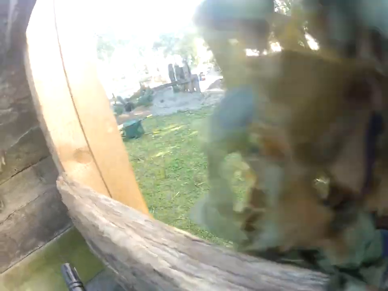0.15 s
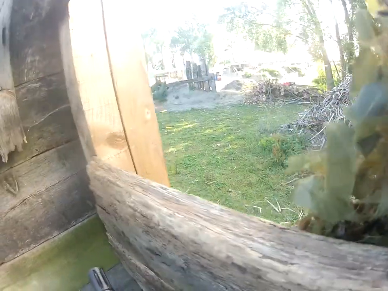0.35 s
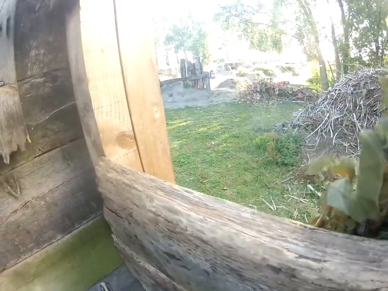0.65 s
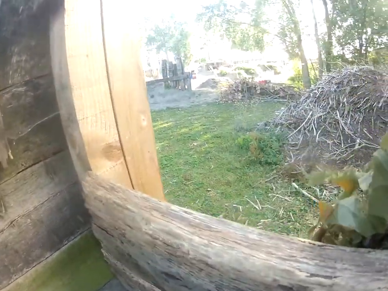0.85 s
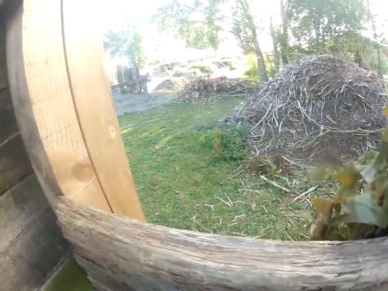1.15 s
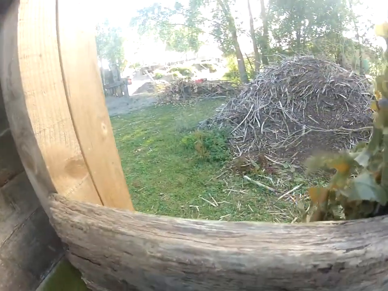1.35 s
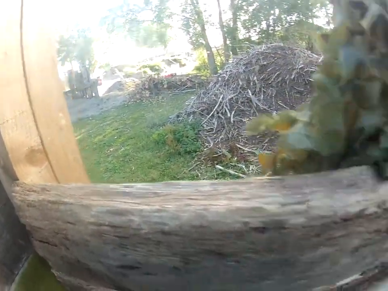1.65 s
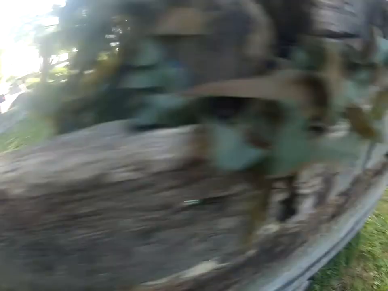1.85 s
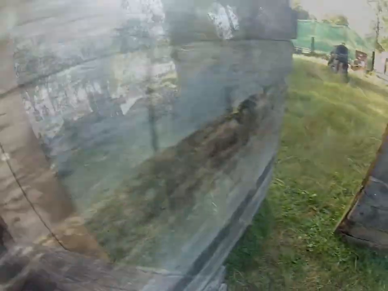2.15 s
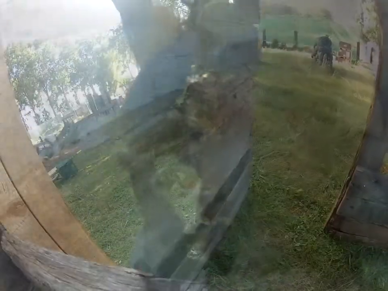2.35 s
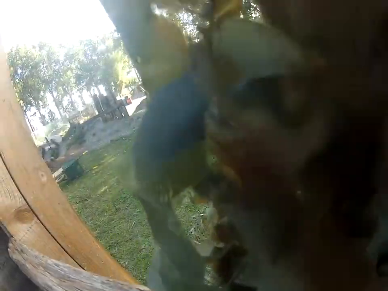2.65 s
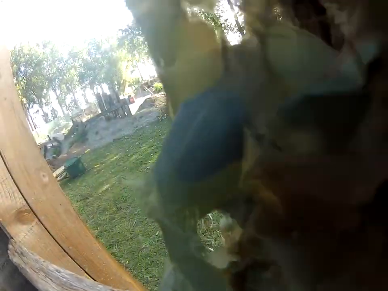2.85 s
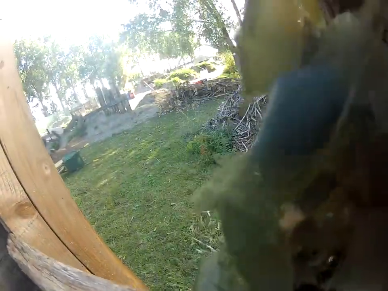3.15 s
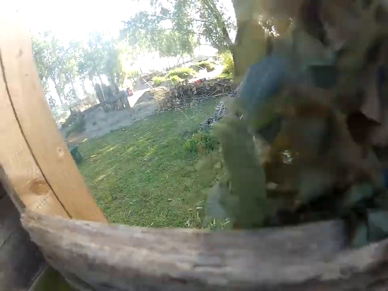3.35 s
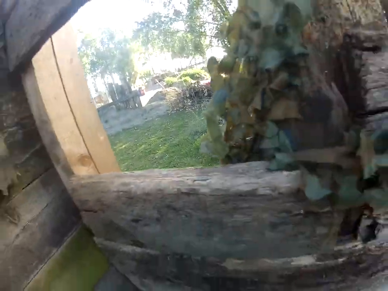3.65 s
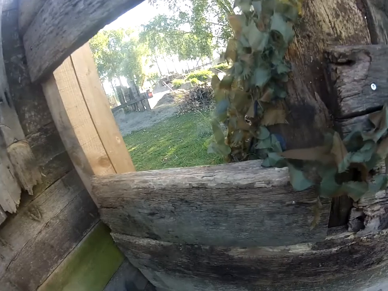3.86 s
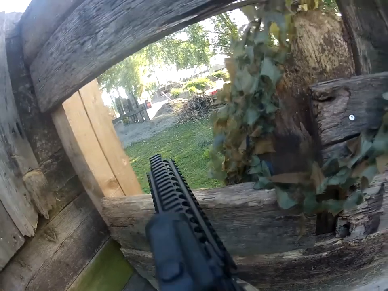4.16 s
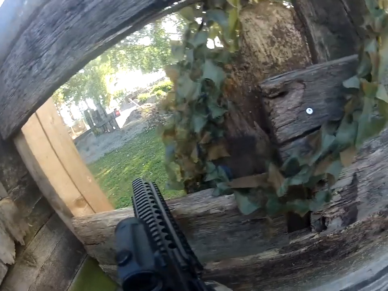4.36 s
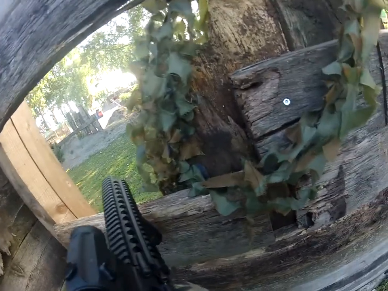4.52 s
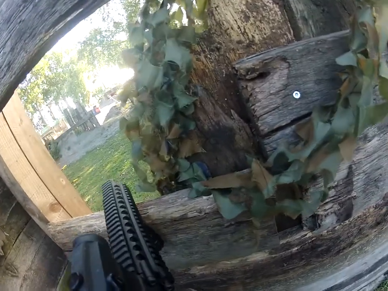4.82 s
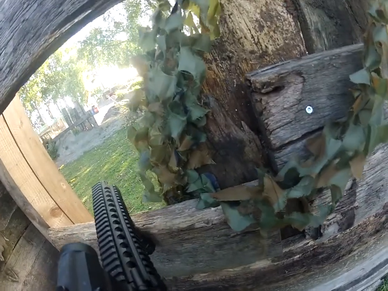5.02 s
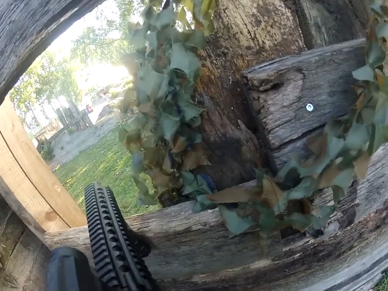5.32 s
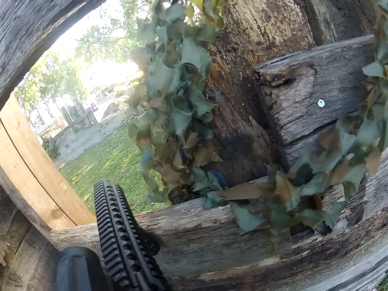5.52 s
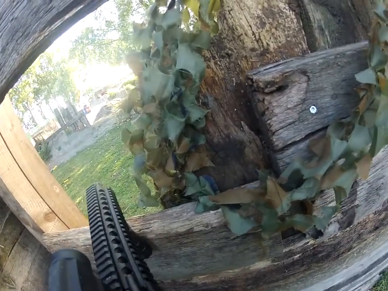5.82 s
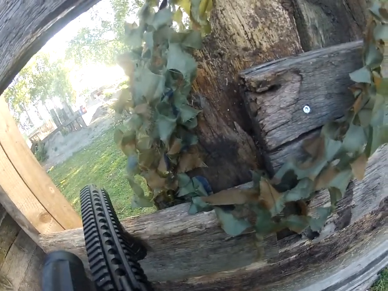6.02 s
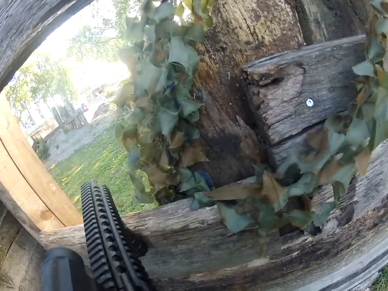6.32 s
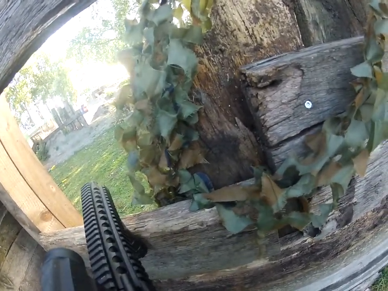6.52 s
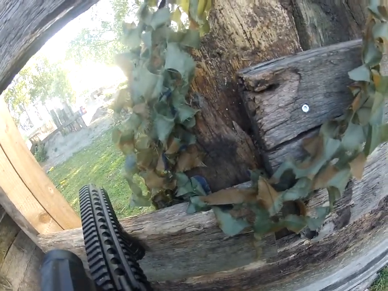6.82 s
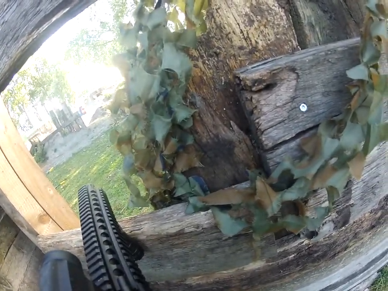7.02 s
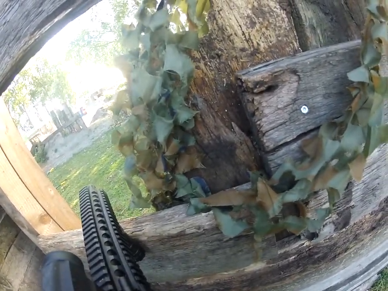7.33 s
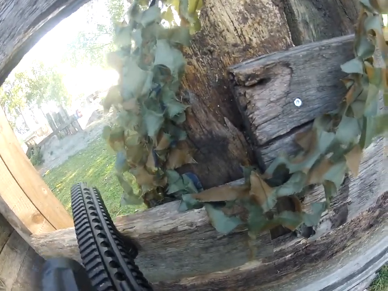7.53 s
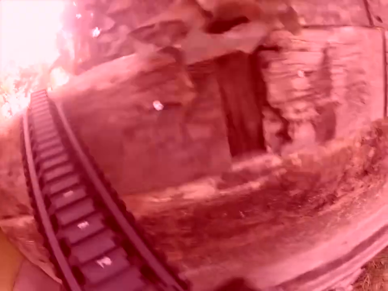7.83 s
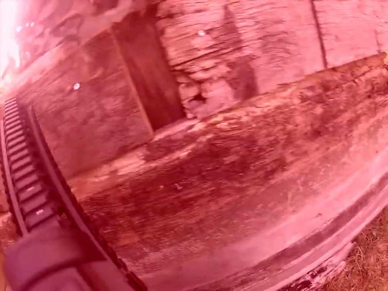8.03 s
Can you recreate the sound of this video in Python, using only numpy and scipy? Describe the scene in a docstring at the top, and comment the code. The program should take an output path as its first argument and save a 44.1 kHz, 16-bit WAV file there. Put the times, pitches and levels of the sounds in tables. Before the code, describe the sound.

Faint outdoor hush and gear clicks, then seven quick whirring airsoft rifle snaps, ending in loud, close pellet hits.

```python
"""A dull open-field hush with sparse gear clicks, bumps and rustles, heard by a body camera in a case.
From 5.7 s an electric airsoft rifle fires seven single cycles from behind a wooden barricade:
the motor spins up, gears draw the spring, the piston slams and the camera mount shakes.
At the end pellets strike right by the microphone and overload it."""
import sys
import numpy as np
from scipy import signal
from scipy.fft import rfft, irfft, next_fast_len
from scipy.io import wavfile
from scipy.ndimage import minimum_filter1d

SR = 44100
rng = np.random.default_rng(int(sys.argv[2]) if len(sys.argv) > 2 else 0)


def unload_wav(signal):
    """Save mono or channel-first audio to the path in sys.argv[1] as 16-bit WAV at rate SR, clipped to [-1, 1]."""
    wavfile.write(
        sys.argv[1],
        SR,
        np.round(np.clip(np.atleast_2d(signal).T, -1, 1) * 32767).astype(np.int16),
    )


N = 360738


def amp(db):
    return 10 ** (np.asarray(db) / 20)


def unit(x):
    return x / np.sqrt(np.mean(x ** 2) + 1e-20)


def add(track, s, sound):
    """Mix a sound into the track at s seconds."""
    part = track[round(s * SR):][:len(sound)]
    part += sound[:len(part)]


def body(x, spectrum, modes=(), size=8192):
    """x through a causal body of unit energy: a broad colour with resonances on top."""
    f = np.fft.rfftfreq(size, 1 / SR)
    hz, db = np.transpose(spectrum)
    cepstrum = irfft(np.log(amp(np.interp(np.log(f + 1), np.log(hz), db))))
    cepstrum[1:size // 2] *= 2
    cepstrum[size // 2 + 1:] = 0
    peaks = 1 + sum(amp(lift) * 1j * f * w / (c * c - f * f + 1j * f * w) for c, w, lift in modes)
    answer = irfft(np.exp(rfft(cepstrum)) * peaks)
    return signal.fftconvolve(x, answer / np.linalg.norm(answer))[:len(x)]


def fade(t, t60):
    """Falls 60 dB in t60 seconds."""
    return np.exp(-np.log(1000) * t / t60)


def ring(modes, attack):
    """One second of damped modes."""
    t = np.arange(SR) / SR
    partials = sum(amp(db) * np.sin(2 * np.pi * hz * t) * fade(t, t60) for hz, db, t60 in modes)
    return partials * (1 - np.exp(-t / attack))


def burst(t60):
    """The dense chatter of a hard contact, dying away."""
    t = np.arange(SR // 4) / SR
    return rng.standard_normal(len(t)) * fade(t, t60)


def grains(count, rate, spread_db):
    """Noise of rms 1 whose strength jumps rate times a second."""
    knots = rng.standard_normal(count)
    level_db = spread_db * np.interp(np.arange(count) * rate / SR, np.arange(count), knots)
    return unit(rng.standard_normal(count) * amp(level_db))


def swell(t, length, attack, release):
    """Rises from t = 0, holds until length, then dies with a t60 of release."""
    return np.clip(t / attack, 0, 1) * fade(np.maximum(t - length, 0), release)


def strokes(rows, attack_s, sag_db_per_s, t60_s, rest_db):
    """Gain of a series of sagging movements over a resting level."""
    t = np.arange(2 * SR) / SR
    power = np.full(N, amp(rest_db) ** 2)
    for start_s, length_s, db in rows:
        gain = amp(db - sag_db_per_s * t) * swell(t, length_s, attack_s, t60_s)
        add(power, start_s, gain ** 2)
    return np.sqrt(power)


def brighter(spectrum, treble_db):
    """A harder contact lifts the treble of a spectrum."""
    return [(hz, db + treble_db * hz ** 2 / (hz ** 2 + 3500 ** 2)) for hz, db in spectrum]


# field air: (frequency [Hz], density [dB])
AIR_SPECTRUM = [(12, -34.5), (20, -4), (60, -6.5), (182, -17), (210, -12), (485, -20.5), (607, -25),
                (1530, -35), (1910, -34.5), (3340, -33), (6010, -44), (8650, -42), (12400, -46.5),
                (14700, -53.5), (16000, -54.5)]

def field_hush():
    """The steady, dull hush of the open field."""
    return amp(-62) * unit(body(rng.standard_normal(N + SR), AIR_SPECTRUM)[SR:])


# mount rumble: (frequency [Hz], density [dB])
RUMBLE_SPECTRUM = [(20, -23), (55, 3), (100, -5.5), (160, -6), (215, -17.5), (300, -31.5), (500, -37),
                   (1000, -53), (2000, -110)]
# body movements: (start [s], length [s], level [dB])
WEIGHT_SHIFTS = [(.13, 0.05, -57.5), (1.78, .22, -52), (3.42, 0.032, -54.5), (4.27, 0.073, -31.5),
                 (4.43, 0.31, -42.5), (4.89, 0.26, -49), (5.05, .2, -44.5), (5.41, .15, -51),
                 (5.79, 1.2, -49.5), (7.5, 0.28, -45), (7.815, 0.099, -18), (7.94, 0.073, -46.5)]

def weight_shifts():
    """The shooter shifts his weight and the camera mount rumbles."""
    gain = strokes(WEIGHT_SHIFTS, attack_s=.021, sag_db_per_s=11, t60_s=.15, rest_db=-67.5)
    return gain * unit(body(rng.standard_normal(N), RUMBLE_SPECTRUM))


def mount_buzz(shake):
    """A thin buzz near 12 kHz follows the shaking."""
    spectrum = [(10000, -74), (11600, -17), (11900, 4.5), (12200, 5.5), (12500, -29.5), (14000, -63)]
    return amp(-27) * np.abs(shake) * unit(body(rng.standard_normal(N), spectrum))


# light contacts: (time [s], level [dB], centre [Hz], t60 [s], treble [dB])
GEAR_CLICKS = [(.197, -42.5, 2050, .045, 10), (1.959, -56.5, 4800, .05, 13), (2.896, -56, 2200, 0.033, 4),
               (4.269, -35.5, 1830, 0.019, 0), (4.284, -45, 1290, 0.036, -20),
               (4.313, -49, 1220, 0.027, -32), (4.459, -45.5, 1110, 0.038, -48),
               (4.554, -56, 2000, 0.038, 9), (5.261, -47, 1030, 0.027, -30),
               (5.289, -43.5, 1790, 0.053, 3.5), (5.608, -42, 2080, 0.052, 7), (7.063, -36, 2020, 0.053, 7),
               (7.238, -33.5, 2170, 0.049, 9), (7.623, -31, 5400, 0.043, 8), (7.744, -39.5, 2360, 0.12, 0),
               (8.036, -54.5, 1500, 0.056, -6.5)]
# click colour: (frequency [Hz], density [dB])
CLICK_SPECTRUM = [(200, -21), (550, -4.5), (1200, 4.5), (2400, -1.5), (3800, -2.5), (5000, -4),
                  (9000, -9.5), (12000, -8), (15000, -11), (16000, -38.5)]
# gearbox and receiver: (centre [Hz], width [Hz], lift [dB])
RIFLE_RESONANCES = [(1100, 69, -4.5), (1905, 140, 16.5), (2350, 150, 9), (2794, 80, 7.5), (3170, 230, 3.5),
                    (3700, 170, 5), (4900, 110, -8.5), (7000, 93, -7), (8260, 240, 6.5), (9100, 43, 9.5),
                    (9870, 68, 6.5), (14050, 76, 10.5)]

def gear_clicks():
    """Small pitched contacts: bright on the rifle's parts, dull on wood."""
    out = np.zeros(N)
    for s, db, hz, t60, treble_db in GEAR_CLICKS:
        wake_db = min(treble_db, 0) - 2  # dull contacts hardly wake the rifle
        modes = [(f, width, lift + wake_db) for f, width, lift in RIFLE_RESONANCES]
        click = body(burst(t60), brighter(CLICK_SPECTRUM, treble_db), [(hz, .2 * hz, 6)] + modes)
        add(out, s, amp(db) * click)
    return out


# mount bumps: (time [s], level [dB], pitch [Hz], t60 [s])
MOUNT_BUMPS = [(0.401, -40.5, 43.5, 0.15), (2.60, -28.5, 66, 0.13), (4.261, -11, 73, 0.04),
               (4.31, -25.5, 62.3, 0.25), (4.42, -15, 54.4, 0.1), (4.496, -24, 88.5, 0.075),
               (4.55, -26, 120, 0.078), (5.072, -28.5, 135, 0.055), (7.4452, 7, 320, .026),
               (7.835, -20, 75, 0.19), (7.863, -13, 46.8, 0.31)]

def mount_bumps():
    """Each bump rings two low modes of the camera mount."""
    out = np.zeros(N)
    for s, db, hz, t60 in MOUNT_BUMPS:
        add(out, s, amp(db) * ring([(hz, 0, t60), (1.97 * hz, -6, t60 / 2)], attack=.007))
    return out


# knocks and pellets: (time [s], crack [dB], centre [Hz], t60 [s], treble [dB], thud [dB])
CASE_STRIKES = [(1.004, -39, 3500, 0.042, 9, -65), (1.7602, -32, 1250, 0.023, -2.5, -55),
                (7.4451, 10.5, 3690, 0.018, 4.5, -1.5), (7.6602, 3.5, 1780, 0.02, 3, -4),
                (7.809, 8.5, 2224, 0.021, 3, 12.5), (7.829, -12, 2430, 0.026, -0.5, -27),
                (7.8566, -5, 1487, 0.021, -9, -8), (7.884, -15, 1930, 0.016, -7, -16.5),
                (7.9356, 1.5, 1136, 0.015, 0.5, -10)]
# case colour: (frequency [Hz], density [dB])
CASE_SPECTRUM = [(150, -4.5), (400, -4.5), (800, -3), (1200, 0), (2700, -0.5), (3900, -7.5), (4600, -17),
                 (7000, -18.5), (9500, -12), (12000, -9.5), (14800, -12), (16000, -55)]
# case modes: (centre [Hz], width [Hz], lift [dB])
CASE_RESONANCES = [(1220, 120, -3.5), (1755, 110, 5.5), (2750, 110, -7.5), (3700, 280, -1), (8420, 200, 4)]
# metal fittings: (time [s], level [dB], pitch [Hz], t60 [s])
FITTING_PINGS = [(7.4452, -50.5, 706, 1), (7.6601, -34, 830, 0.14), (7.9355, -44, 840, 0.132)]

def strikes():
    """Close blows crack in the case, which flexes with a thud; some pellets ring a metal fitting."""
    out = np.zeros(N)
    thud = ring([(215, 0, .025)], attack=.00073)
    for s, crack_db, hz, t60, treble_db, thud_db in CASE_STRIKES:
        modes = [(hz, .13 * hz, 4)] + CASE_RESONANCES
        add(out, s, amp(crack_db) * body(burst(t60), brighter(CASE_SPECTRUM, treble_db), modes))
        add(out, s, amp(thud_db) * thud)
    for s, db, hz, t60 in FITTING_PINGS:
        add(out, s, amp(db) * ring([(hz, 0, t60), (2.4 * hz, -12, .2)], attack=.001))
    return out


# brushes on the net: (start [s], length [s], level [dB])
NET_BRUSHES = [(1.33, 0.044, -67), (1.73, .03, -66), (1.94, 0.095, -71.5), (2.88, 0.23, -72),
               (3.06, .04, -64), (3.14, 0.073, -66.5)]

def net_crackle():
    """The camouflage net's leaves crackle when brushed."""
    spectrum = [(500, -20.5), (1400, 0), (2200, 6.5), (4000, -1), (6000, -8.5), (9000, -6), (15000, -6)]
    leaves = unit(body(grains(N, rate=330, spread_db=5.5), spectrum))
    return leaves * strokes(NET_BRUSHES, attack_s=.02, sag_db_per_s=10, t60_s=.17, rest_db=-78)


# cloth on wood: (start [s], length [s], level [dB])
CLOTH_RUBS = [(1.72, 0.25, -63.5), (2.08, .1, -65), (2.26, 0.036, -67.5), (4.27, 0.054, -65.5),
              (4.53, .1, -72), (7.55, 0.057, -61.5), (7.82, 0.052, -28), (7.885, 0.052, -28)]
# friction colour: (frequency [Hz], density [dB])
RUB_SPECTRUM = [(200, -14), (700, -2), (1200, 1), (2400, -4.5), (3800, -10), (5500, -20), (10000, -11),
                (14500, -20.5), (16000, -39)]
# rubbed wood: (centre [Hz], width [Hz], lift [dB])
PLANK_RESONANCES = [(1196, 190, 3.5), (1865, 200, 9)]

def cloth_rubs():
    """Sleeves and netting catch and slip over the wood."""
    friction = unit(body(grains(N, rate=440, spread_db=2.5), RUB_SPECTRUM, PLANK_RESONANCES))
    return friction * strokes(CLOTH_RUBS, attack_s=.013, sag_db_per_s=8.5, t60_s=.072, rest_db=-75.5)


LEAD_S, CATCH_S, DROP_S = .13, .057, .012  # before the slam: motor start, piston caught, let go

def motor_cycle():
    """Time from the slam, tooth rate and gear level: the spring's load slows and loudens the gears."""
    full_speed_hz, load_sag = 1446, .33
    spin_up_s, coast_s, quieten_s = .075, .09, .056
    t = np.arange(round(2 * LEAD_S * SR)) / SR - LEAD_S
    after_s = np.maximum(t, 0)
    spin = np.sin(np.pi / 2 * np.clip((t + LEAD_S) / spin_up_s, 0, 1))
    draw = np.clip((t + CATCH_S) / (CATCH_S - DROP_S), 0, 1)
    rundown = 1 - np.exp(-after_s / quieten_s)
    tooth_hz = full_speed_hz * spin * (1 - load_sag * draw * (t < 0)) * np.exp(-after_s / coast_s)
    load_db = -10.5 - 31 * (1 - spin) + 11.5 * draw - 46.5 * rundown
    return t, tooth_hz, load_db


# firing cycles: (slam time [s], slam [dB], gears [dB], mount kick [dB], run-down offset [dB])
FIRING_CYCLES = [(5.8652, -18, -31, -24.5, 3), (6.0669, -18, -30.5, -20.5, 2), (6.2535, -18, -31, -23, 2),
                 (6.4533, -17, -31, -20.5, 1.5), (6.684, -18, -31.5, -22, 3.5),
                 (6.9153, -18, -31, -24, 3.5), (7.4500, -25, -31.5, -25, -16.5)]
# sector gear catches, drags, drops the piston: (time from slam [s], level re gears [dB], t60 [s])
SECTOR_TICKS = [(-.057, 2, .035), (-.034, -1, 0.018), (-.012, 8, .02)]
# released spring: (frequency [Hz], level [dB], t60 [s])
SPRING_MODES = [(2760, -5.5, 0.31), (3610, -12, .25), (9300, -13, 0.27)]
# gearbox and receiver: (frequency [Hz], density [dB])
RIFLE_SPECTRUM = [(200, -13.5), (600, -9.5), (1000, 1.5), (1500, -6), (2200, -1), (3600, 0.5), (4600, -2.5),
                  (7000, -4.5), (10000, -8), (13000, -17.5), (15200, -4.5), (16000, -21)]

def gearbox():
    """The motor whines, teeth grind on the draw; the piston slams, rebounds and rings the spring."""
    knocks, tones = np.zeros(N), np.zeros(N)
    t, tooth_hz, load_db = motor_cycle()
    free_run = np.exp(-((t + .0772) / .014) ** 2)  # clear whine only before the load
    slack_db = -7 * np.exp(-((t + .003) / .0035) ** 2)  # piston in flight
    for s, slam_db, gear_db, _, rundown_db in FIRING_CYCLES:
        jitter = 1 + rng.normal(0, .03) + .7 * rng.standard_normal(len(t))
        tooth_count = np.cumsum(tooth_hz * jitter) / SR
        contacts = np.diff(np.floor(tooth_count), prepend=0)
        teeth = unit(contacts * rng.lognormal(0, .86, len(t)))
        grind = .5 * teeth + .73 * grains(len(t), rate=290, spread_db=4.5)
        add(knocks, s - LEAD_S, amp(gear_db + load_db + slack_db + rundown_db * (t > 0)) * grind)
        whine = free_run * np.sin(2 * np.pi * tooth_count)
        add(tones, s - LEAD_S, amp(gear_db - 14 + rng.normal(0, 1.5)) * whine)
        for offset_s, tick_db, t60 in SECTOR_TICKS:
            add(knocks, s + offset_s, amp(gear_db + tick_db) * burst(t60))
        add(knocks, s, amp(slam_db + 3) * burst(t60=.014))
        add(knocks, s + .0028, amp(slam_db) * burst(t60=.026))  # rebound
        add(tones, s, amp(slam_db - 26.5) * ring(SPRING_MODES, attack=.001))
        latch_s = s + rng.uniform(.053, .074)  # the gears settle on their latch
        add(knocks, latch_s, amp(slam_db - 31.5) * burst(t60=.12))
    return body(knocks, RIFLE_SPECTRUM, RIFLE_RESONANCES) + tones


# camera mount: (frequency [Hz], level [dB], t60 [s])
MOUNT_MODES = [(57.5, 3, 0.46), (153.2, -13, 0.33), (208, -10, 0.039)]

def mount_recoil():
    """Motor torque, then piston recoil, shake the camera on its mount."""
    out = np.zeros(N)
    t = motor_cycle()[0]
    loaded = swell(t + CATCH_S, length=.075, attack=.0039, release=.2)
    shaking = amp(-26.5) + amp(-5.5) * loaded
    for s, slam_db, _, kick_db, _ in FIRING_CYCLES:
        add(out, s - .056, amp(kick_db) * ring(MOUNT_MODES, attack=.004))
        add(out, s - .003, amp(slam_db - 14.5) * ring(MOUNT_MODES, attack=.003))
        rumble = unit(body(rng.standard_normal(len(t)), RUMBLE_SPECTRUM))
        add(out, s - LEAD_S, amp(kick_db) * shaking * rumble)
    return out


def scene():
    """All sources at the microphone, mono."""
    shake = weight_shifts() + mount_bumps() + mount_recoil()
    contacts = gear_clicks() + strikes() + net_crackle() + cloth_rubs()
    return np.array([field_hush() + shake + mount_buzz(shake) + contacts + gearbox()])


def gain_control(x, threshold_db, depth_db, hold, lag):
    """An overload turns the gain down for a moment."""
    need_db = np.clip(threshold_db - 20 * np.log10(np.abs(x) + 1e-9), -abs(depth_db), 0)
    size = 2 * round(hold * SR / 2) + 1
    held_db = minimum_filter1d(need_db, size, origin=size // 2)
    step = 1 / (lag * SR)
    return x * amp(signal.lfilter([step], [1, step - 1], held_db))


# case shading the microphone: (centre [Hz], width [Hz], gain [dB])
CASE_DIPS = [(6000, 330, -7.5), (11326, 396, -27), (12570, 660, -21)]

def record(dry):
    """The gain ducks, the microphone overloads softly, the case notches the treble; steep band edge."""
    ceiling, top_hz = .6, 15750
    ducked = gain_control(dry, threshold_db=0, depth_db=11, hold=.057, lag=.015)
    clipped = ducked / (1 + np.abs(ducked / ceiling) ** 4) ** (1 / 4)
    size = next_fast_len(N + SR)
    f = np.fft.rfftfreq(size, 1 / SR)
    shade_db = sum(db * np.exp(-((f - hz) / width) ** 2) for hz, width, db in CASE_DIPS)
    low_pass = 1 / (1 + (f / top_hz) ** 120)
    return irfft(rfft(clipped, size) * amp(shade_db) * low_pass, size)[:, :N]


dry = scene()
out = record(dry)
unload_wav(out)
```